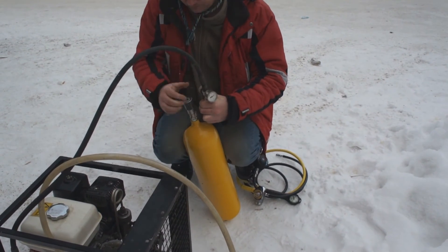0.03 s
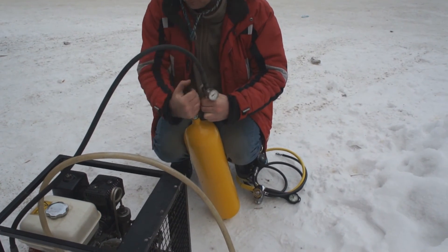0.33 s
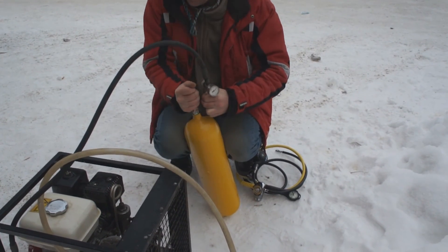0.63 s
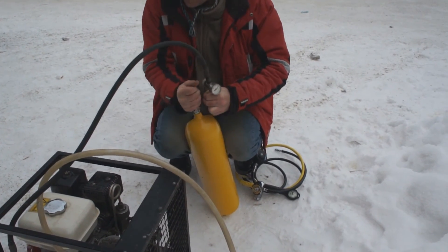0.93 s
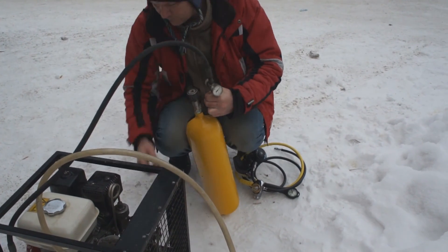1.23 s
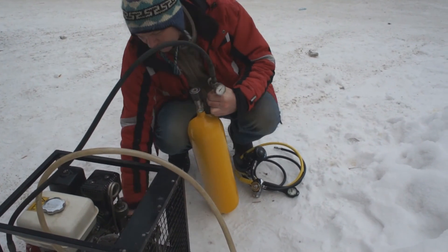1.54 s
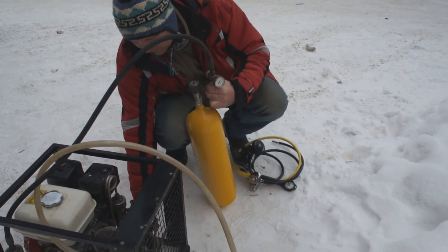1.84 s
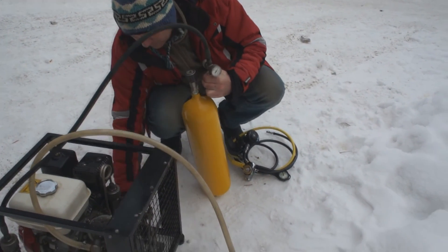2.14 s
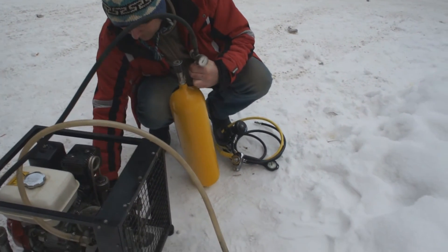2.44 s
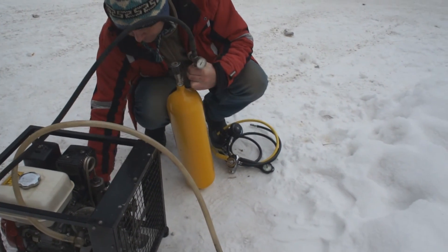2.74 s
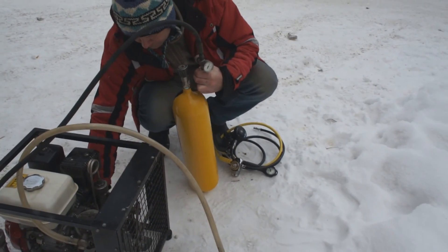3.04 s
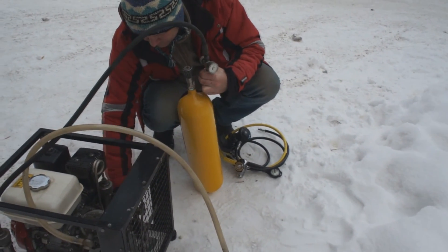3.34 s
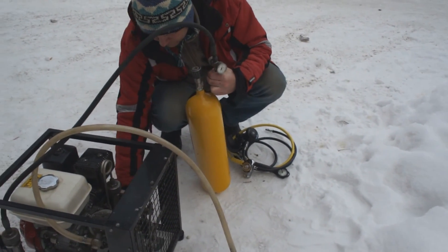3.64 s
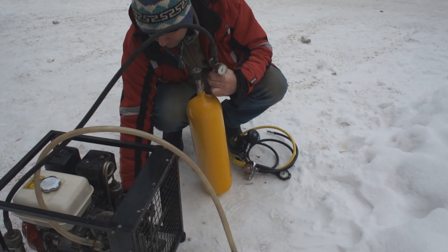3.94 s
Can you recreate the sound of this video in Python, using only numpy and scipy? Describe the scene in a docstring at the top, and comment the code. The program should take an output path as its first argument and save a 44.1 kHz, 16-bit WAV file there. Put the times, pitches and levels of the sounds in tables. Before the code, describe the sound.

Compressed air vents from a hose coupling on a steel cylinder in a loud, bright hiss. A breathy whistle climbs and vanishes early, then the hiss shifts slightly in tone and carries on, close by outdoors with no echo.

```python
"""Compressed air vents from the coupling of a hose and a steel cylinder, outdoors on snow.
From the start the jet makes a dense, bright hiss, strong near 2.6, 5 and 10 kHz, over a very faint hum.
A breathy whistle climbs out of the hiss and is gone by 1.4 s. Around then the man holding the cylinder
leans over, which shifts the hiss's tone and left-right balance. The air hisses on to the end at 4 s."""
import sys
import numpy as np
from scipy import signal
from scipy.fft import rfft, irfft, next_fast_len
from scipy.io import wavfile
from scipy.ndimage import uniform_filter1d, map_coordinates

SR = 44100
rng = np.random.default_rng(int(sys.argv[2]) if len(sys.argv) > 2 else 0)


def wrap_up_sound(samples):
    """Save the sound to the file named by the first command line argument, as 16-bit audio."""
    columns = np.atleast_2d(samples).T
    # keep every value between -1 and 1, then stretch to whole-number steps
    tamed = np.clip(columns, -1, 1)
    steps = np.round(tamed * 32767).astype(np.int16)
    wavfile.write(sys.argv[1], SR, steps)


N = 176400

# How strong the hiss sounds from low to high, with a deep dip near 13.5 kHz: pitch_hz, relative_level_db
HISS_SPECTRUM = [(25, -52), (45, -45), (65, -35), (100, -35.5), (160, -30), (280, -24), (400, -27),
                 (800, -25.5), (1250, -19), (1700, -11), (1950, -13.5), (2300, -7.5), (2750, -4.5),
                 (3050, -9.5), (3400, -9.5), (4000, -8), (4450, -6), (4800, -2), (5150, -2), (5900, -5),
                 (6420, -9.5), (7100, -4.5), (7900, -7.5), (8700, -6), (9600, -0.37), (10500, 0),
                 (11300, -3), (12200, -3), (13000, -15.5), (13500, -33), (14900, -15), (15700, -41)]
# How alike the two microphones hear the jet: pitch_hz, likeness_0_to_1
MIC_LIKENESS = [(60, .38), (160, .66), (400, .45), (900, .55), (1500, .4), (2600, .76), (3000, .9),
                (3350, .55), (4050, .42), (4600, .75), (5200, .87), (6400, .6), (7000, .79), (8200, .55),
                (10000, .72), (11400, .52), (12400, .55), (15000, .23)]
# How far the left microphone's wave runs ahead of the right's: pitch_hz, lead_radians
MIC_LEAD = [(0, 0), (1030, 0.74), (1380, 1.31), (1640, 3.35), (2240, 5.4), (2670, 4.4), (2930, 2.84),
            (3300, 2.47), (4570, -1.3), (6200, -2.6), (6550, -2.0), (7580, -2.7), (9560, -7.0),
            (10400, -7.6), (11800, -12.0), (13500, -12.6), (14000, -12.6), (14700, -14.9), (15000, -13.2),
            (15700, -13.8), (16300, -16.1)]
# The middles of six bands of the hiss: pitch_hz
BAND_PITCHES = [700, 2200, 4800, 7200, 10100, 12200]
# Slow changes in those bands: time_s, then one boost_db for each band
BAND_BOOSTS = [(0, 3.5, -2, -2.5, 7, -4.5, -5), (0.12, 1.7, -2.5, -2.5, 4.5, -5, -6),
               (0.22, 1, -1.7, -3.5, 7, -8.5, -4.5), (0.42, 1.7, -1, -0.5, 6, -8, -3),
               (0.62, 0, -3, -3, 3.5, -8, -3.5), (0.92, -1.5, -2, -1.5, 1.5, -6.5, -2),
               (1.03, 1, -0.5, 0.5, 2, -3.5, -5), (1.2, 1, -1, 0.3, 0.5, -4.5, -6),
               (1.33, 1.7, 1, 2, 0.6, -1.8, -1), (1.55, 0.4, 3, 2, 2, 1, -1),
               (1.8, 1.1, 2.5, 2, 1.7, 1, -3.5), (2.15, -0.2, 1.2, 1.5, -1.3, 0.9, -3),
               (2.55, 0.4, 0.6, 1.5, 0.5, 2.5, -1), (2.9, 0.5, 0.9, -0.1, -0.5, 2, -3),
               (3.2, 0.5, 1, 1.5, -0.5, 3, -2), (3.55, -0.5, -0.2, 1.5, -0.5, 2.1, -0.5),
               (3.75, 0, 0, 0, -3, 0, -0.5), (4, 0, 2.5, -0.3, -1, -0.8, 0.6)]
# Sound bouncing off the man and the cylinder: start_s, end_s, delay_s, left_gain, right_gain
BOUNCES = [(-.3, 1, .000731, .17, .04), (-.3, 1.1, .00137, .13, .01), (1.4, 4.4, 0.0017, .01, 0.26),
           (2, 3.7, 0.002, 0.0084, 0.041), (2.102, 4.3, 0.00068, 0.19, .01), (2.1, 4.3, .001118, .14, .01),
           (2.1, 3.1, 0.0011, .01, .13)]
# Passing resonances of the jet: start_s, end_s, pitch_hz, width_hz, left_boost_db, right_boost_db
JET_RESONANCES = [(0.21, 0.7, 5900, 225, 3.5, 8.5), (-.2, 0.77, 11300, 300, 2, 8.5),
                  (-.2, 0.36, 12400, 200, -5, 10.5), (-.2, 1.2, 8650, 280, 1, 2),
                  (-.2, 1.35, 4350, 260, 2, 1), (-.2, 1.7, 2190, 160, 1, 1.5), (.92, 1.32, 7600, 500, 5, 3),
                  (1.05, 1.3, 9860, 280, 3, 4), (1.05, 1.32, 10750, 400, 8, 5),
                  (1.25, 1.8, 1070, 200, 1.5, 1), (1.46, 2.1, 4460, 200, 3, 2), (1.6, 4.2, 5200, 210, 2, 0),
                  (1.92, 2.28, 7800, 300, 7, 5), (3.6, 4.2, 8400, 250, 9, 8)]
# The whistle at the coupling: time_s, pitch_hz, boost_db
WHISTLE_PATH = [(.1, 10160, 7), (.52, 10040, 10), (.66, 10560, 12.5), (1, 10680, 10), (1.06, 11300, 9),
                (1.16, 11800, 7), (1.25, 12400, 9.5), (1.31, 12450, 3), (1.38, 12470, -1)]
# The hum's two upper tones: pitch_hz
HUM_PITCHES = [522, 785]
# How they swell and fade: time_s, lower_tone_level_db, higher_tone_level_db
HUM_SWELLS = [(0, -59, -59), (.35, -61.5, -68), (.6, -65, -68), (1.7, -66, -66), (2.4, -77, -78),
              (2.8, -61.5, -56), (3.1, -60, -61), (3.6, -74, -64), (4, -74, -72)]
# Balance of the hiss before and after the man leans over: pitch_hz, left_minus_right_db
UPRIGHT_BALANCE = [(100, -0.5), (280, -1), (600, -4), (1050, -2), (1600, 10.5), (2100, 1), (2650, 7.5),
                   (3200, -2.5), (3900, 0.5), (4500, 16.5), (5200, 4.5), (5900, 5.5), (6900, -1),
                   (8000, -0.5), (9000, 4), (9700, -9), (10700, -6.5), (11500, 2), (12300, -15),
                   (15000, -2)]
LEANING_BALANCE = [(100, -1.5), (280, -1), (600, 1.5), (1050, -0.5), (1600, 13.5), (2100, 1.5),
                   (2650, 10.5), (3200, 0.5), (3900, 6.5), (4500, 9), (5200, 5.5), (5900, 1), (6900, 0.5),
                   (8000, 3), (9000, -14), (9700, 1), (10700, -13.5), (11500, 2.5), (12300, -8),
                   (15000, -1)]

HISS_BASE_DB = -16.5
PATCHY_DB, FLUTTER_DB, FLUTTER_PER_S = 0.9, 0.39, 29  # turbulence: the air swirls unevenly
SPUTTER_DB, SPUTTER_PER_S = 0.38, 250  # its fine grain
BOUNCE_FADE_S, RESONANCE_FADE_S = 0.46, 0.12
DRONE_HZ, DRONE_DB = 159, -70.5  # the hum's lowest tone
HUM_WAVER_DB, HUM_WAVER_RADIANS = 2, 1.5
LEAN_MIDDLE_S, LEAN_TAKES_S = 1.7, 0.75
PEAK_LIMIT, TOP_HZ = .92, 15700


def gain(db):
    """Turn decibels into a number to multiply by."""
    return 10 ** (np.asarray(db) / 20)


def normalise(x):
    """Scale to an average (rms) level of 1."""
    return x / np.sqrt(np.mean(x ** 2) + 1e-20)


def at_pitches(table, hz):
    """Read a table between its rows, giving each octave equal room."""
    pitches, values = np.transpose(table)
    return np.interp(np.log(hz + 1), np.log(pitches + 1), values)


def at_times(table, t):
    """Read each column after the first at the times t."""
    times, *columns = np.transpose(table)
    return np.array([np.interp(t, times, column) for column in columns])


def wobble(per_s):
    """A smooth curve through per_s random values a second."""
    points = rng.standard_normal(int(N * per_s / SR) + 4)
    return map_coordinates(points, [np.arange(N) * per_s / SR])


def fade_in_out(t, start, end, fade_s):
    """Rise from 0 after start, to 1 at most, and fall back by end."""
    return np.clip(np.minimum(t - start, end - t) / fade_s, 0, 1)


def bump(hz, pitch_hz, width_hz):
    """A bell-shaped hill around one pitch."""
    return np.exp(-.5 * ((hz[:, None] - pitch_hz) / width_hz) ** 2)


def jet_noise():
    """Rushing air makes steady noise, which reaches each microphone a little differently."""
    size = next_fast_len(N + 8192)
    hz = np.fft.rfftfreq(size, 1 / SR)
    shared, apart = rfft(rng.standard_normal((2, size))) * gain(at_pitches(HISS_SPECTRUM, hz))
    spread = np.arccos(np.clip(at_pitches(MIC_LIKENESS, hz), 0, 1)) / 2
    sides = np.array([[1], [-1]])  # left, right
    stereo = np.cos(spread) * shared + sides * np.sin(spread) * apart
    lead = np.exp(.5j * sides * np.interp(hz, *np.transpose(MIC_LEAD)))
    return normalise(irfft(stereo * lead, size)[:, :N])


def bounce_gain(hz, t):
    """Close reflections come and go as the man moves, lifting some pitches and thinning others."""
    total = 1  # the direct sound
    for start, end, delay_s, left, right in BOUNCES:
        delayed = np.exp(-2j * np.pi * hz * delay_s)
        bounce = np.outer(delayed, fade_in_out(t, start, end, BOUNCE_FADE_S))
        total = total + np.multiply.outer([left, right], bounce)
    return total


def resonance_db(hz, t):
    """The jet's resonances briefly change narrow bands of the hiss on each side."""
    total = 0
    for start, end, pitch_hz, width_hz, left_db, right_db in JET_RESONANCES:
        shape = bump(hz, pitch_hz, width_hz) * fade_in_out(t, start, end, RESONANCE_FADE_S)
        total = total + np.multiply.outer([left_db, right_db], shape)
    return total


def whistle_db(hz, t):
    """Air whistles at the coupling: one narrow, climbing band of the hiss stands out."""
    pitch_hz, boost_db = at_times(WHISTLE_PATH, t)
    return boost_db * bump(hz, pitch_hz, width_hz=344)


def venting_air():
    """The escaping jet hisses with a drifting tone, and turbulence roughens it."""
    hz, t, grid = signal.stft(jet_noise(), SR, nperseg=1024)  # side by pitch by time
    band_shares = np.array([np.interp(hz, BAND_PITCHES, row) for row in np.eye(len(BAND_PITCHES))])
    drift_db = band_shares.T @ at_times(BAND_BOOSTS, t)
    speckles = rng.standard_normal(grid.shape[1:])
    streaks = uniform_filter1d(speckles, size=12, axis=0)  # blur across pitch
    patches = normalise(uniform_filter1d(streaks, size=7, axis=1))  # then across time
    boost_db = drift_db + resonance_db(hz, t) + whistle_db(hz, t) + PATCHY_DB * patches
    shaped = grid * bounce_gain(hz, t) * gain(boost_db) * leaning_gain(hz, t)
    hiss = signal.istft(shaped, SR)[1][:, :N]
    flutter_db = FLUTTER_DB * wobble(FLUTTER_PER_S)
    sputter_db = SPUTTER_DB * wobble(SPUTTER_PER_S)
    return hiss * gain(HISS_BASE_DB + flutter_db + sputter_db)


def hum():
    """Three faint, wavering low tones; the upper two swell and fade."""
    t = np.arange(N) / SR
    total = 0
    for pitch_hz, level_db in [(DRONE_HZ, DRONE_DB), *zip(HUM_PITCHES, at_times(HUM_SWELLS, t))]:
        height = np.sqrt(2) * gain(level_db + HUM_WAVER_DB * wobble(per_s=2.7))
        phase = 2 * np.pi * pitch_hz * t + HUM_WAVER_RADIANS * wobble(per_s=5.02)
        total = total + height * np.sin(phase)
    return total


def leaning_gain(hz, t):
    """As the man leans over, each pitch of the hiss shifts between left and right."""
    lean = np.clip((t - LEAN_MIDDLE_S) / LEAN_TAKES_S + .5, 0, 1)
    upright_db = np.outer(at_pitches(UPRIGHT_BALANCE, hz), 1 - lean)
    leaning_db = np.outer(at_pitches(LEANING_BALANCE, hz), lean)
    left_over_right = gain(upright_db + leaning_db)
    right = np.sqrt(2 / (1 + left_over_right ** 2))  # keeps the total power the same
    return np.array([left_over_right * right, right])


def scene():
    """Hiss and hum in the open air over snow, with no distant echo."""
    return venting_air() + hum()


def record(dry):
    """The rare highest peaks of the hiss are flattened, and nothing above TOP_HZ is kept."""
    size = next_fast_len(N + 8192)
    flattened = np.clip(dry, -PEAK_LIMIT, PEAK_LIMIT)
    kept = np.fft.rfftfreq(size, 1 / SR) < TOP_HZ
    return irfft(rfft(flattened, size) * kept, size)[:, :N]


dry = scene()
out = record(dry)
wrap_up_sound(out)
```